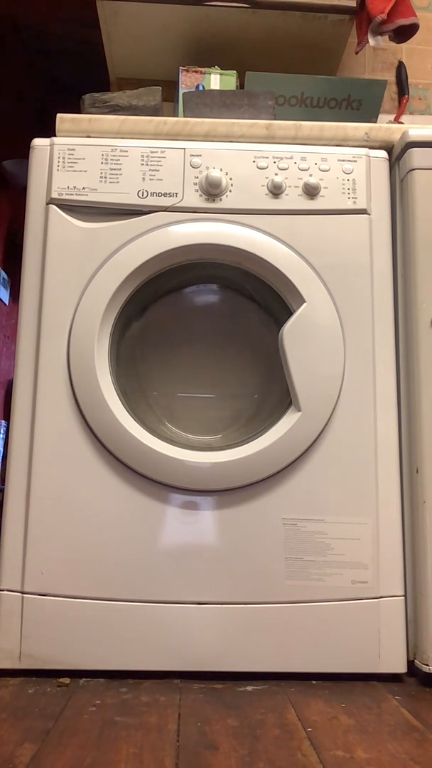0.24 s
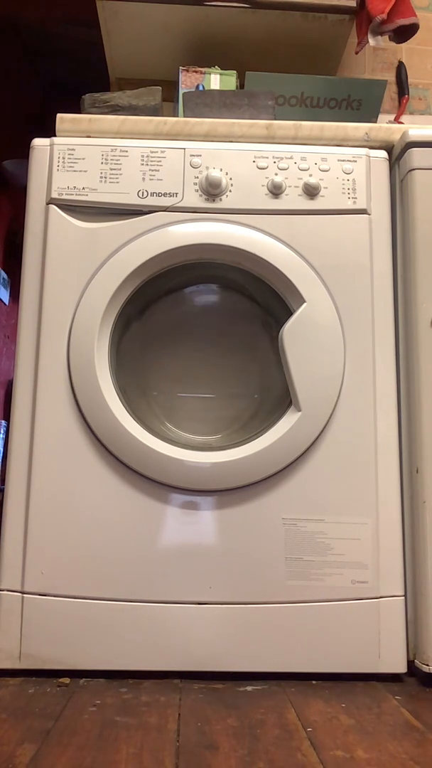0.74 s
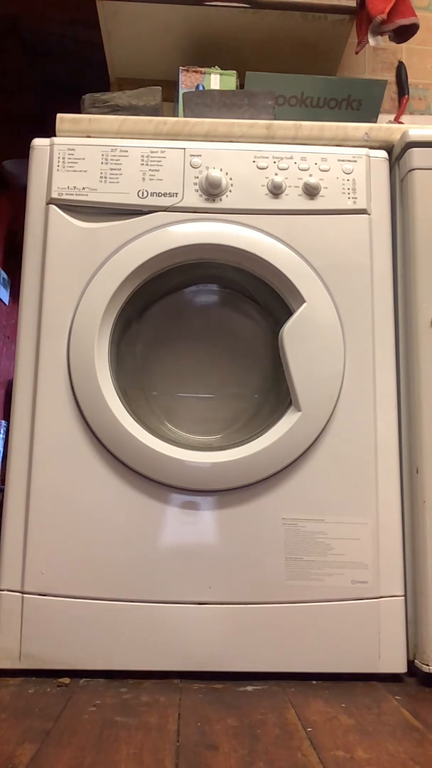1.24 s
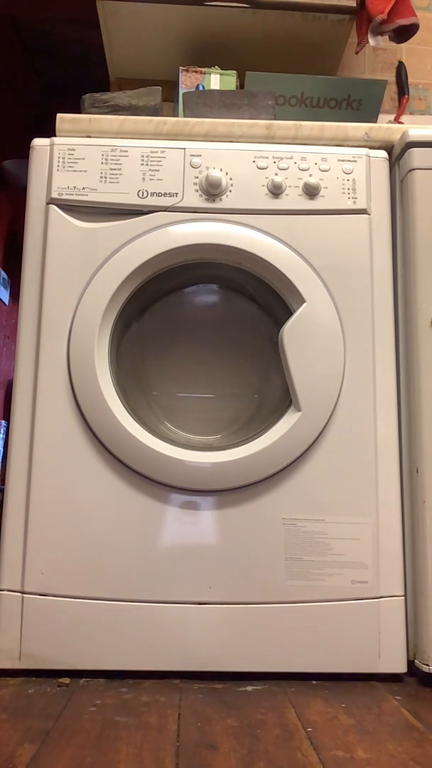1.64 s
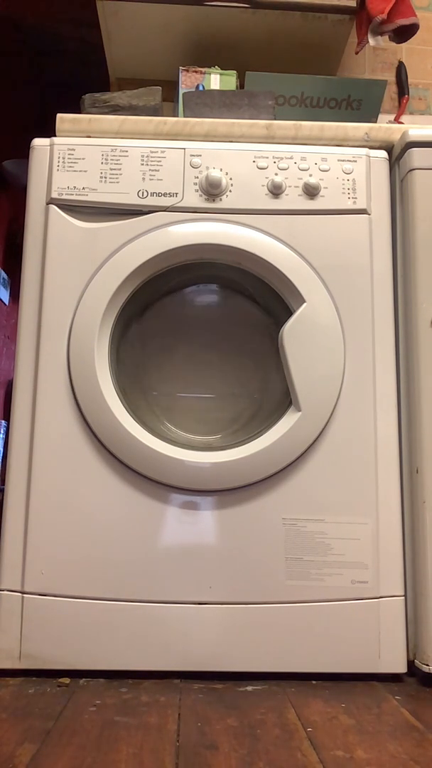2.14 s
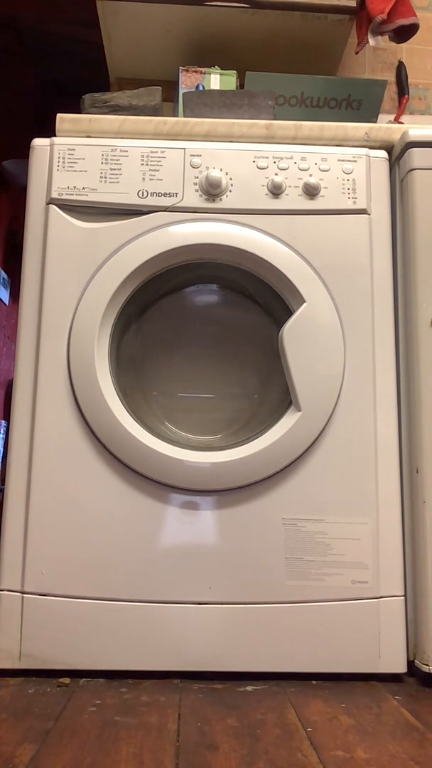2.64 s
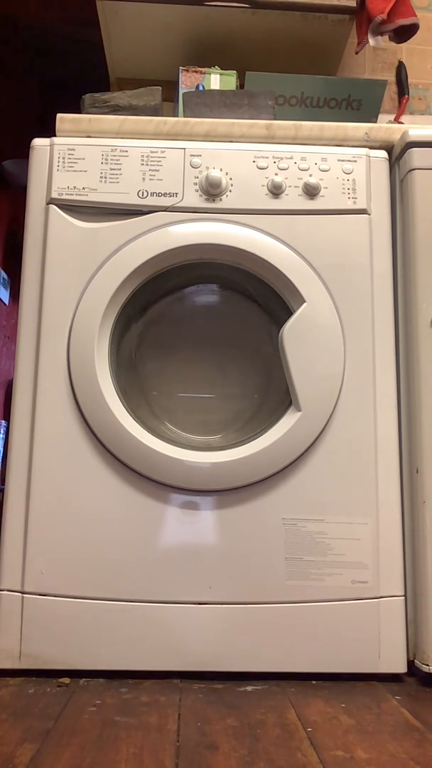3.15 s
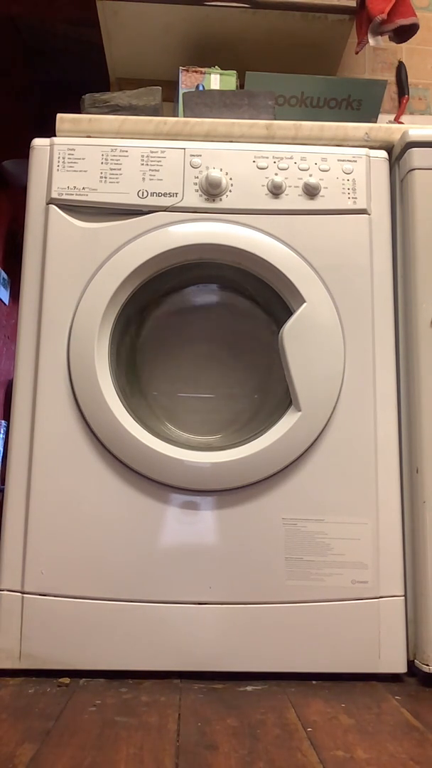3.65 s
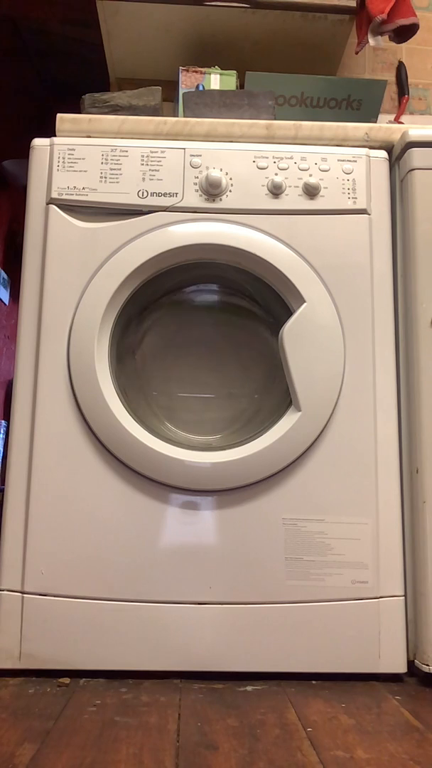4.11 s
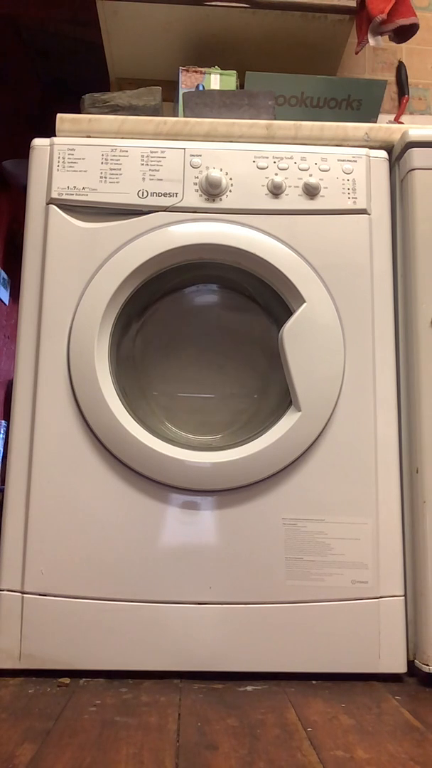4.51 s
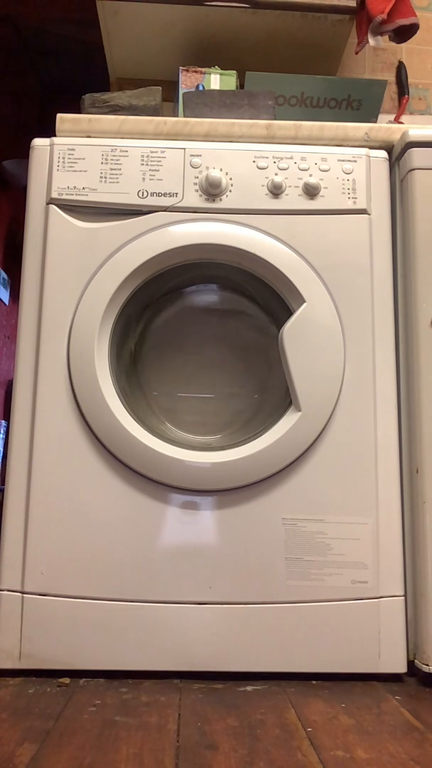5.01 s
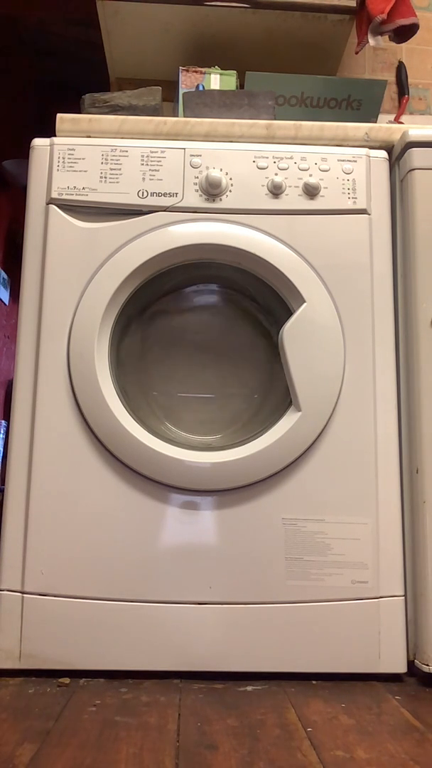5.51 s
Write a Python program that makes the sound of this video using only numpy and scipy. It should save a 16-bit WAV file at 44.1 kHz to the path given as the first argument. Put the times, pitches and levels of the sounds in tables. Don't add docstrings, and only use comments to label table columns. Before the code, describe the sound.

Motor whine with fine metallic buzz and brush hiss descends smoothly for over five seconds, swelling as it passes panel resonances. Over its start, wet laundry rolls and knocks against the drum in a dense cluster; a shorter, softer cluster follows after a pause. Afterwards only faint shifts of cloth remain beneath the whine, with bearing rush, low hum and quiet room tone. Close, dull in the bass, small kitchen reverberation.

```python
import sys
import numpy as np
from scipy import signal
from scipy.fft import rfft, irfft, next_fast_len
from scipy.io import wavfile
from scipy.ndimage import map_coordinates

SR = 44100
rng = np.random.default_rng(int(sys.argv[2]) if len(sys.argv) > 2 else 0)


def persist_wave(psi):
    counts = np.round(np.clip(psi, -1, 1) * 32767).astype(np.int16)
    wavfile.write(sys.argv[1], SR, np.atleast_2d(counts).T)


def decibels_to_gain(level_db):
    exponent = np.asarray(level_db, float) / 20
    return 10 ** exponent


N = 254456
TIME_S = np.arange(N) / SR

# time_s, bar_rate_hz (commutator bars passing a second)
MEAN_SPEED = [(0.0, 1070.7), (0.44, 1026.2), (0.89, 978.8), (1.33, 930.7), (1.78, 887.0), (2.22, 842.6),
              (2.66, 794.9), (3.11, 748.1), (3.55, 701.4), (3.99, 654.8), (4.44, 610.0), (4.88, 573.7),
              (5.33, 554.8), (5.77, 565.7)]
BARS_PER_TURN, LUMP_START_RAD, SWAY_HZ, SWAY_GROWS = 434.06, 2.54, 10.72, 1.25
# time_s, sparking_db, odd_bar_unevenness_db, shell_ringing_db
BRUSHES = [(0, -74.5, -5, 0), (.25, -77, -3, -4), (.42, -77, -5.5, 3), (.7, -75.5, -6.5, -3.5),
           (1.25, -77, -4, -10), (1.45, -69, -5, -4.5), (1.7, -70, -12, -3.5), (1.85, -67.5, -14, -1),
           (2.45, -67.5, -4.5, 2), (2.75, -69, -11, -1.5), (3, -69.5, -6, -0.5), (3.3, -68, -27, -3),
           (3.6, -71, -20, 3.5), (4.05, -71, -24.5, 4), (4.4, -76.5, -8.5, 3), (4.9, -76.5, -1, 1),
           (5.35, -78, 2.5, -0.5), (5.77, -76, 2, -1)]
# bar_rate_hz, click_level_db, hiss_shell_ringing_db
BY_SPEED = [(560, -68, -1), (630, -67, -2), (682, -64.5, 2.5), (750, -59, 2.5), (790, -61.5, 4),
            (1070, -60.5, 6.5)]
# multiple, level_on_a_mode_db, level_between_modes_db
ROTOR_TONES = [(1, 1.3, -87), (2, 2.4, -71.5), (3, 0.6, -67.5), (4, 0.04, -75.5)]
# multiple, level_db
CLICK_MULTIPLES = [(5, 7), (6, 6), (7, 2.5), (8, 0.5), (9, 1.5), (10, 4), (13, 3), (17, -4.5), (20, -10.5),
                   (23, -5)]
# multiple, level_db
HALFWAY_MULTIPLES = [(1.5, -1), (2.5, -1), (3.5, 2.5), (4.5, -11.5), (5.5, 0.5), (6.5, 0.5), (7.5, -1.5),
                     (8.5, 3), (9.5, -1), (12, -3), (21, -22)]
# centre_hz, width_hz, level_db
PANEL_AND_CASE_MODES = [(557, 15, -65), (632, 23, -61), (683, 40, -62.5), (735, 49, -46.5), (760, 13, -55),
                        (867, 52, -57), (925.6, 28, -58), (1090, 92, -79), (1356, 95, -61), (1560, 95, -64),
                        (1731, 82, -54), (1896, 30, -58), (1982, 240, -55.5), (2105, 38, -63),
                        (2245, 130, -66.5), (2408, 61, -55), (2527, 99, -54), (2780, 270, -56.5),
                    (2950, 220, -57), (3127, 160, -55.5), (3439, 87, -44.5), (3657, 106, -44.5),
                    (3890, 290, -54.5), (4099, 132, -42), (4296, 100, -45.5)]
MODE_STEEPNESS = 2.28
# centre_hz, width_hz, level_db
CABINET_MODES = [(878, 33, -7), (1560, 73, -15), (2046, 91, -14.5), (3672, 240, -6), (4168, 47, -0.5),
                 (4370, 80, -1), (4730, 160, 5), (5387, 270, 1), (5980, 22, 1.5), (6500, 97, -14),
                 (6750, 230, -10), (7200, 130, -6.5), (7976, 29, -3.5), (8320, 44, -3), (9020, 220, -11.5),
                 (10160, 85, -29.5), (10560, 70, -11.5), (12400, 45, -19), (13300, 97, -32),
                 (13750, 140, -17)]
# pitch_hz, level_db
WHINE_SPECTRUM = [(500, -40), (1050, -61), (1500, -17), (2300, -25), (3000, -15), (3430, -20.5),
                  (3900, -14), (4600, 0), (5100, -9), (5700, -13), (6300, -9), (8500, -15), (10000, -18),
                  (15600, -30)]
# middle_hz, half_width_hz
SHELL_BAND = (4550, 1100)
SPARK_SHARPENS_DB_PER_DB, SHARP_ABOVE_HZ = 0.5, 9000

# centre_hz, width_hz, level_db
SHELL_MODES = [(3580, 320, -16.5), (4120, 100, -8), (4680, 83, -5.5), (5600, 140, -16.5)]
# pitch_hz, density_db_per_hz
HISS_SPECTRUM = [(530, -63), (900, -80), (1330, -15), (1620, -45.5), (1760, -17), (3190, -27.5),
                 (4350, -6.5), (4730, -0.5), (5590, -6.5), (8190, -3.5), (10200, -11), (12600, -8),
                 (15600, -18.5)]

# start_s, length_s, level_db
TUMBLES = [
    (-.05, 0.784, -51.5),
    (1.43, 0.55, -55),
]
TUMBLE_EDGE_S, REST_DB, REST_FADE_DB_PER_S = 0.0094, -70, -0.5
# time_s, peak_db, ring_hz, crack_db
THUDS = [(0.096, -30.5, 255, -27), (0.149, -33, 660, -28), (0.204, -45, 420, -12), (0.254, -31, 230, -19),
         (0.284, -26, 250, -24), (0.353, -28.5, 217, -29), (0.373, -29.5, 772, -15), (0.446, -51, 237, -22),
         (0.51, -28.5, 574, -11.5), (0.529, -30, 228, -23), (0.613, -36, 320, -17), (0.64, -43, 770, -18),
         (0.715, -39.5, 790, -16), (0.725, -36, 398, -19), (0.889, -47, 107, -47), (1.08, -44, 110, -40),
         (1.46, -38, 237, -20), (1.497, -28, 304, -15), (1.555, -32, 235, -28), (1.607, -40, 334, -37),
         (1.669, -32.5, 236, -39), (1.722, -39, 307, -20), (1.754, -33.5, 554, -29), (1.867, -36, 234, -29),
         (1.955, -33, 240, -21), (2.22, -48, 100, -51)]
THUD_T60_S, THUD_SWELL_S, THUD_SWELL_DB = 0.032, 0.025, -24
# time_s, level_db
SHIFTS = [(.88, -67), (1.06, -58), (1.3, -62), (2.2, -69), (2.36, -60.5), (2.71, -61.5), (3.12, -66),
          (3.41, -63), (4.32, -71), (4.95, -71), (5.77, -60)]
SHIFT_S = 0.036
SLAP_DB, SOFT_SLAP_DB = -1.5, -4
# centre_hz, width_hz, level_db
DRUM_MODES = [(237, 14, -4), (554, 28, -3), (759, 49, -10.5), (1264, 57, -19), (1540, 10, -17)]
# pitch_hz, density_db_per_hz
SLOSH_SPECTRUM = [(24, -67), (40, -39), (84, -8.5), (232, -5.5), (365, -7.5), (395, -8), (788, -11),
                  (997, -23.5), (1620, -33), (1700, -16), (2210, -92), (3740, -120)]

# multiple_of_the_pull, braking_db, driving_db
HUM = [(2, -84.5, -69), (3, -74, -65), (4, -61.5, -64.5)]
PULL_HZ, TUMBLE_HUM_DB = 99.9, -3
DRIVE_S, DRIVE_RISE_S = 4.9, 0.1
HUM_GAP_S, HUM_GAP_WIDE_S, HUM_GAP_DB = 5.47, 0.2, -23
HUM_GROWS_DB_PER_S, HUM_RETURNS_DB = 2, 8

# pitch_hz, density_db_per_hz
BELT_SPECTRUM = [(530, -41), (900, -26), (955, -17), (1620, -8.5), (1860, -4), (2200, -9), (2800, -3),
                 (3300, -6.5), (4290, -23), (7260, -120)]
# pitch_hz, density_db_per_hz
ROOM_TONE_SPECTRUM = [(18, -68), (30, -24), (292, -27.5), (344, -22.5), (398, -14.5), (469, -19),
                      (590, -25), (718, -15.5), (874, -38), (1500, -24.5), (1950, -54), (3300, -120)]
# pitch_hz, t60_s
KITCHEN_T60 = [(200, 0.38), (2000, 0.51), (10000, 0.28)]


def whine():
    bar_hz = bar_rate()
    spark_db, uneven_db, ring_db = curves(BRUSHES)
    line_db = by_speed(bar_hz, column=1)
    turn = phase(bar_hz) + 0.06 * wobble(40)

    tones = np.zeros(N)
    for k, (_, db, between_db) in enumerate(ROTOR_TONES):
        strength = decibels_to_gain(db + 1.0) * woken((k + 1) * bar_hz, between_db)
        tones += strength * bouncing(k + 1, turn, slow_db=0.4, skirt_db=-18.5 + 3.7 * k)

    whole, half = np.zeros(N), np.zeros(N)
    for k in range(5, 24):
        line = bouncing(k, turn, slow_db=0.94, skirt_db=-10.5 + 0.55 * k)
        whole += decibels_to_gain(along(CLICK_MULTIPLES, k)) * line * (k * bar_hz < 0.45 * SR)
    for k in np.arange(1, 19) + 0.5:
        line = bouncing(k, turn, slow_db=2.5, skirt_db=-12.0 + 0.12 * k)
        half += decibels_to_gain(along(HALFWAY_MULTIPLES, k)) * line * (k * bar_hz < 0.45 * SR)

    clicks = unit(filtered(whole + decibels_to_gain(uneven_db) * half, cabinet))
    sharpen = decibels_to_gain(SPARK_SHARPENS_DB_PER_DB * (spark_db - spark_db.mean()))
    clicks = clicks + (sharpen - 1) * above(clicks, SHARP_ABOVE_HZ)
    return tones, decibels_to_gain(line_db + 21.5) * shell_ring(clicks, ring_db)


def bar_rate():
    mean_hz, = curves(MEAN_SPEED)
    drum_angle = phase(mean_hz) / BARS_PER_TURN + LUMP_START_RAD
    return mean_hz + SWAY_HZ * (800 / mean_hz) ** SWAY_GROWS * np.sin(drum_angle)


def by_speed(bar_hz, column):
    law = np.transpose(BY_SPEED)
    return np.interp(bar_hz, law[0], law[column])


def bouncing(k, turn, slow_db, skirt_db):
    spin = k * turn + 2 * np.pi * rng.random()
    along_line, across = (decibels_to_gain(skirt_db) * (wobble(45) + 0.91 * wobble(130)) for _ in "xy")
    line = (1 + along_line) * np.cos(spin) + across * np.sin(spin)
    return decibels_to_gain(slow_db * wobble(8.9)) * line


def woken(hz, between_db):
    grid = np.arange(400.0, 4500)
    peaks = mode_power(PANEL_AND_CASE_MODES, grid, MODE_STEEPNESS)
    return np.interp(hz, grid, np.sqrt(peaks + decibels_to_gain(2 * between_db)))


def cabinet(f):
    return np.sqrt(mode_power(CABINET_MODES, f) + decibels_to_gain(2 * along(WHINE_SPECTRUM, f)))


def shell_ring(x, ring_db):
    middle_hz, half_width_hz = SHELL_BAND
    band = filtered(x, lambda f: 1 / (1 + ((f - middle_hz) / half_width_hz) ** 6))
    return x + (decibels_to_gain(ring_db) - 1) * band


def hiss():
    bar_hz = bar_rate()
    gate = 1 + 0.58 * np.cos(phase(bar_hz))
    shell = body(SHELL_MODES, HISS_SPECTRUM, between_db=-7.5)
    noise = unit(filtered(gate * rng.standard_normal(N), shell))
    flicker_db = 0.8 * wobble(6.76) + 0.4 * wobble(30)
    level = decibels_to_gain(curves(BRUSHES)[0] + 22.5 + flicker_db)
    noise = noise - np.clip((700 - bar_hz) / 200, 0, 0.8) * above(noise, 13500, steepness=30)
    return level * shell_ring(noise, by_speed(bar_hz, column=2))


def tumbling():
    rest = decibels_to_gain(2 * (REST_DB + REST_FADE_DB_PER_S * TIME_S))
    heaves = swells([(s, db + THUD_SWELL_DB) for s, db, *_ in THUDS], THUD_SWELL_S)
    hard = rolling() + heaves
    soft = rest + swells(SHIFTS, SHIFT_S)
    load = np.sqrt(hard + soft)
    slap_db = (SLAP_DB * hard + SOFT_SLAP_DB * soft) / (hard + soft)

    bumps = (rng.random(N) < 90 / SR) * rng.standard_normal(N) * decibels_to_gain(18.0)
    cloth = decibels_to_gain(1.7 * wobble(25.16)) * rng.standard_normal(N)
    lumpy = unit(filtered(cloth + bumps, body(DRUM_MODES, SLOSH_SPECTRUM, between_db=-5.5)))
    slap = (decibels_to_gain(slap_db + 2.9 * wobble(12)) - 1) * above(lumpy, 420)
    return decibels_to_gain(1.5) * load * (lumpy + slap) + thuds()


def thuds():
    blows, t = np.zeros(N + SR), np.arange(SR // 10) / SR
    for s, db, hz, crack_db in THUDS:
        ring = decibels_to_gain(-60 * t / THUD_T60_S) * (1 - np.exp(-t / 0.0054)) * np.sin(2 * np.pi * hz * t)
        crack = decibels_to_gain(crack_db + 6.5 - 60 * t / 0.0035) * np.sin(2 * np.pi * 1000 * t)
        blows[round(s * SR):][:len(t)] += decibels_to_gain(db + 4.0) * (ring + crack)
    return blows[:N]


def rolling():
    edge = lambda s: 0.5 + 0.5 * np.tanh((TIME_S - s) / TUMBLE_EDGE_S)
    return sum(decibels_to_gain(2 * db) * (edge(s) - edge(s + length)) for s, length, db in TUMBLES)


def swells(rows, wide_s):
    t = np.arange(0, N + 64, 64) / SR
    power = sum(decibels_to_gain(2 * db) * np.exp(-((t - s) / wide_s) ** 2) for s, db in rows)
    return np.repeat(power, 64)[:N]


def hum():
    turn = 2 * np.pi * PULL_HZ * TIME_S
    driving = 0.5 + 0.5 * np.tanh((TIME_S - DRIVE_S) / DRIVE_RISE_S)
    shaken_db = TUMBLE_HUM_DB * np.clip(rolling() / decibels_to_gain(2 * TUMBLES[1][2]), 0, 1)
    second_db, third_db, fourth_db = [low_db + (high_db - low_db) * driving for _, low_db, high_db in HUM]
    second_db, third_db = second_db + shaken_db, third_db + shaken_db
    fourth_db = fourth_db + HUM_GROWS_DB_PER_S * np.clip(TIME_S - 3.4, 0, 1.4)
    fourth_db += HUM_RETURNS_DB * (TIME_S > HUM_GAP_S)
    fourth_db += HUM_GAP_DB * np.exp(-((TIME_S - HUM_GAP_S) / HUM_GAP_WIDE_S) ** 2)

    tones = decibels_to_gain(third_db - 8) * np.sin(5 * turn) + decibels_to_gain(second_db - 10) * np.sin(turn)
    for multiple, db in [(2, second_db), (3, third_db), (4, fourth_db)]:
        tones += decibels_to_gain(db + 4 + 0.4 * wobble(7.4)) * np.sin(multiple * turn)
    return tones


def bearings():
    speed_db = 3.5 * np.log10(curves(MEAN_SPEED)[0] / 800)
    return decibels_to_gain(-66 + 0.73 * wobble(10) + speed_db) * coloured_noise(BELT_SPECTRUM)


def kitchen(x):
    hz, t, z = signal.stft(rng.standard_normal(SR // 2), SR, nperseg=256)
    decay = decibels_to_gain(-60 * t / along(KITCHEN_T60, hz)[:, None])
    tail = signal.istft(z * decay, SR, nperseg=256)[1]
    delayed = np.pad(x, (300, 0))
    return signal.fftconvolve(delayed, tail / np.linalg.norm(tail))[:N]


def room_tone():
    return decibels_to_gain(-68.5 + 2.5 * wobble(2.1)) * coloured_noise(ROOM_TONE_SPECTRUM)


def unit(x):
    return x / np.sqrt(np.mean(x ** 2) + 1e-20)


def along(points, hz):
    f, v = np.transpose(points)
    return np.interp(np.log(hz + 1), np.log(f + 1), v)


def curves(rows):
    s, *columns = np.transpose(rows)
    return [np.interp(TIME_S, s, c) for c in columns]


def phase(hz):
    return 2 * np.pi * np.cumsum(hz) / SR


def wobble(rate):
    knots = rng.standard_normal(1200)
    places = np.arange(N // 32 + 1) * 32 * rate / SR
    return np.repeat(map_coordinates(knots, [places]), 32)[:N]


def filtered(x, response):
    m = next_fast_len(N + SR // 2)
    return irfft(rfft(x, m) * response(np.fft.rfftfreq(m, 1 / SR)), m)[..., :N]


def above(x, hz, steepness=6):
    return filtered(x, lambda f: 1 / (1 + (hz / (f + 1)) ** steepness))


def coloured_noise(spectrum):
    return unit(filtered(rng.standard_normal(N), lambda f: decibels_to_gain(along(spectrum, f))))


def mode_power(modes, f, steepness=1):
    return sum(decibels_to_gain(2 * db) / (1 + (2 * (f - c) / w) ** 2) ** steepness for c, w, db in modes)


def body(modes, spectrum, between_db):
    def response(f):
        gain = decibels_to_gain(between_db + along(spectrum, f))
        for k, (c, w, db) in enumerate(modes):
            gain = gain + (-1) ** k * decibels_to_gain(db) * 1j * f * w / (c * c - f * f + 1j * f * w)
        return gain
    return response


def scene():
    tones, clicks = whine()
    machine = clicks + hiss() + tumbling() + bearings()
    mono = tones + machine + decibels_to_gain(-6.5) * kitchen(machine) + hum() + room_tone()
    return np.array([mono, mono])


def low_pass(x):
    return signal.sosfilt(signal.butter(12, 15770, fs=SR, output="sos"), x)


def record(dry):
    mix = filtered(dry, lambda f: f ** 3 / (f ** 3 + 70 ** 3))
    return low_pass(mix)


dry = scene()
out = record(dry)
persist_wave(out)
```